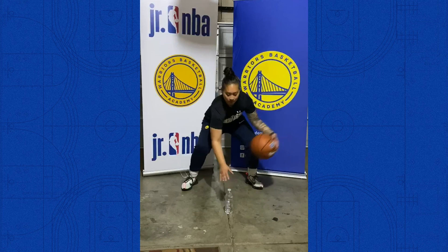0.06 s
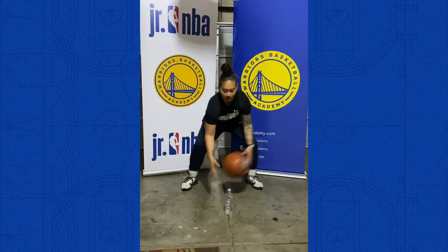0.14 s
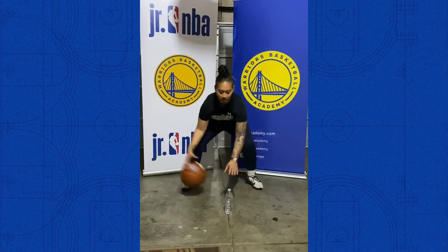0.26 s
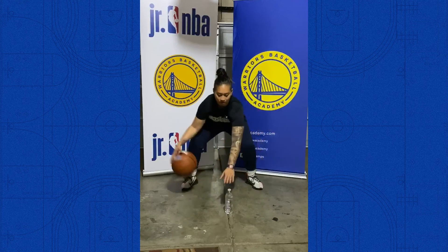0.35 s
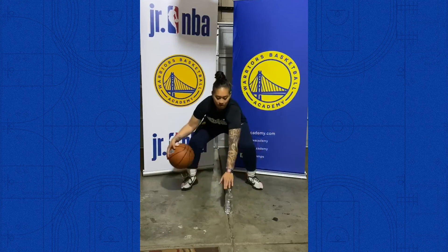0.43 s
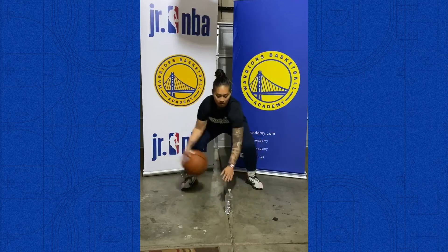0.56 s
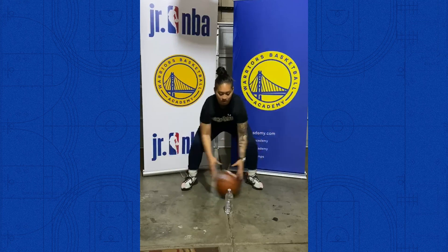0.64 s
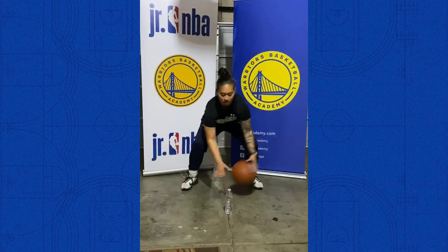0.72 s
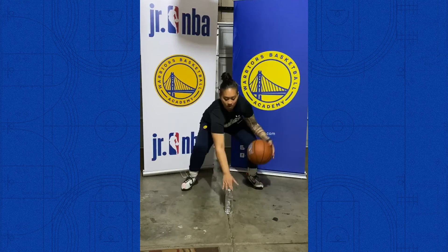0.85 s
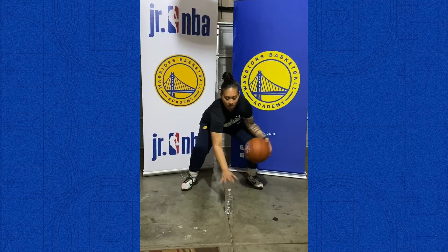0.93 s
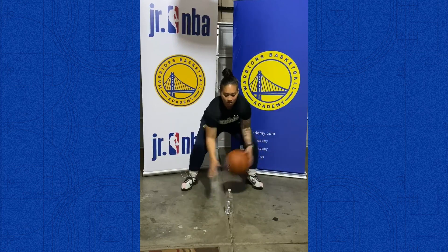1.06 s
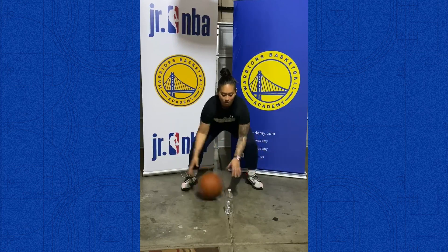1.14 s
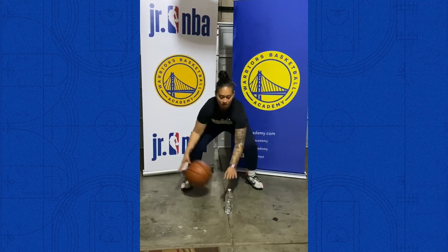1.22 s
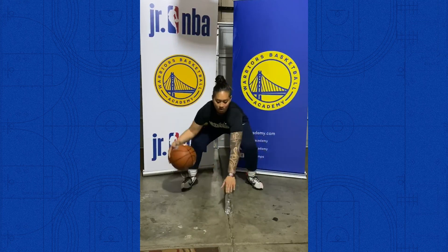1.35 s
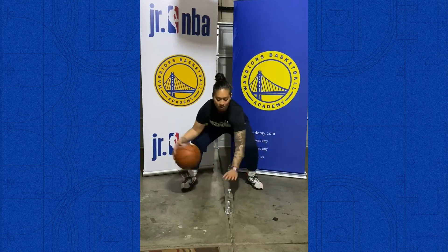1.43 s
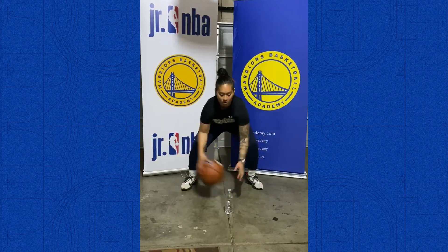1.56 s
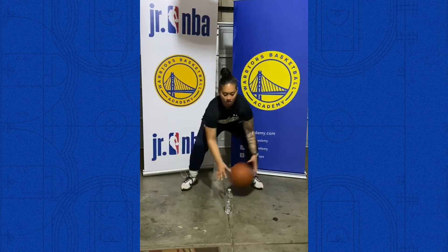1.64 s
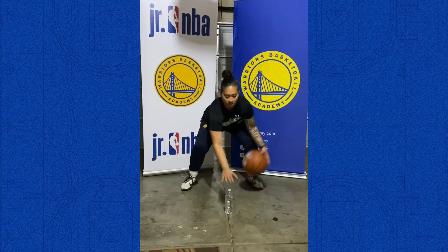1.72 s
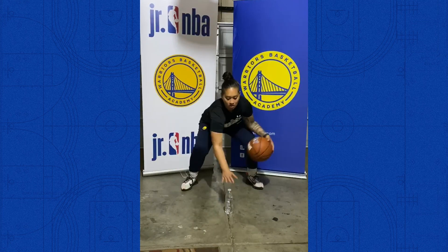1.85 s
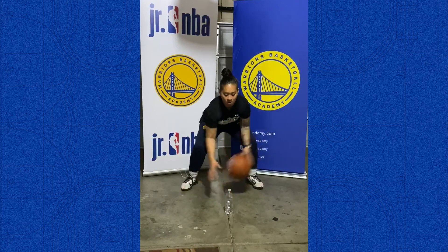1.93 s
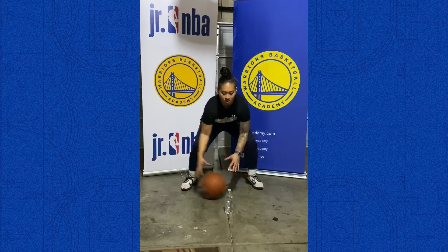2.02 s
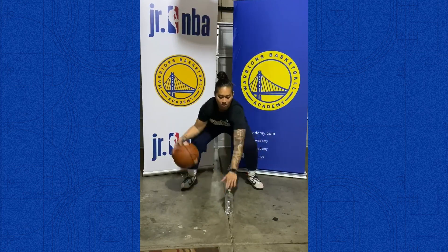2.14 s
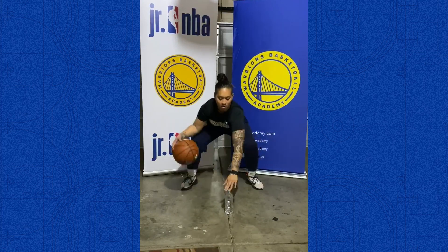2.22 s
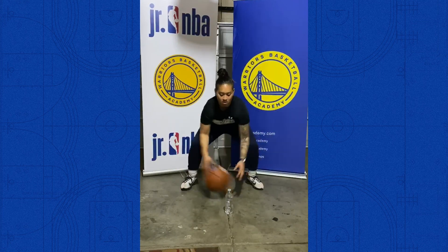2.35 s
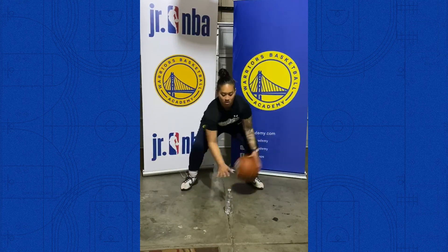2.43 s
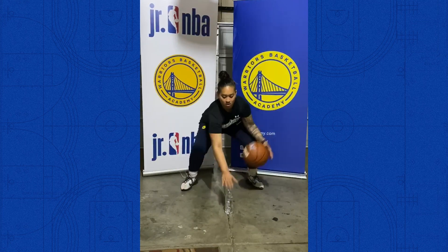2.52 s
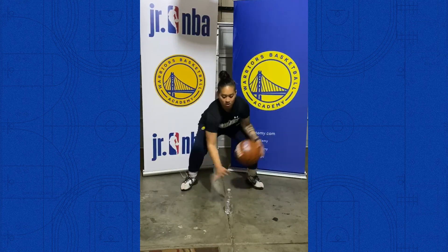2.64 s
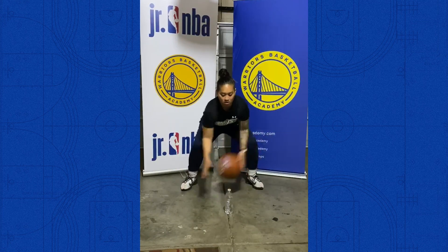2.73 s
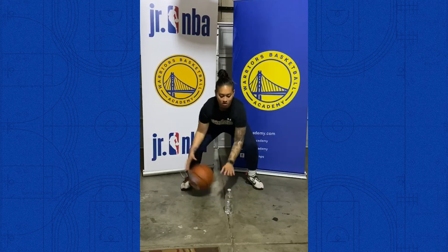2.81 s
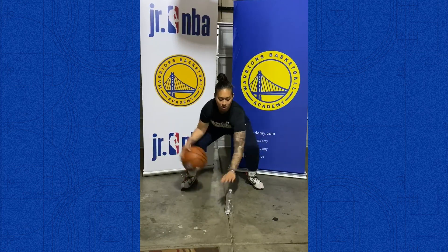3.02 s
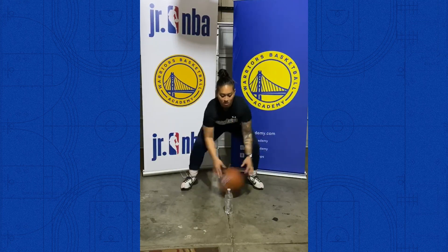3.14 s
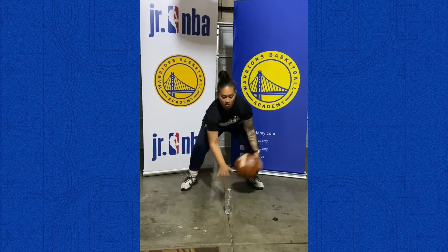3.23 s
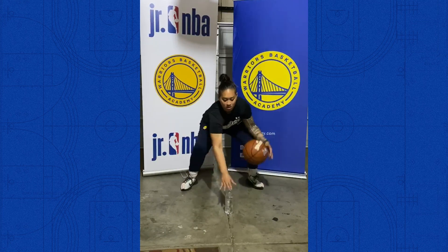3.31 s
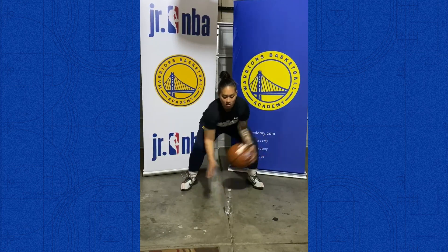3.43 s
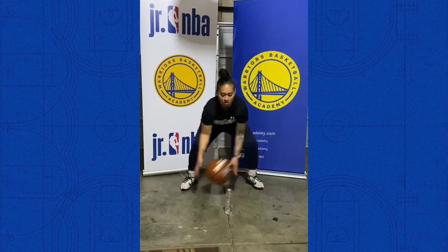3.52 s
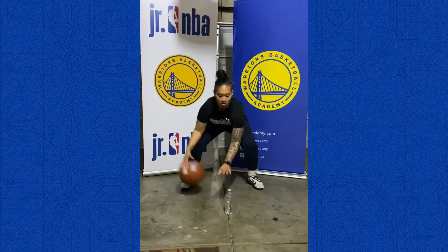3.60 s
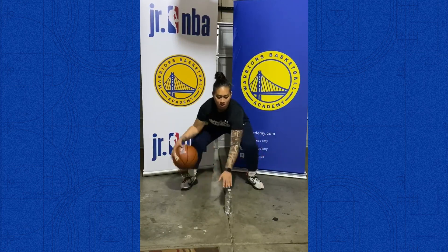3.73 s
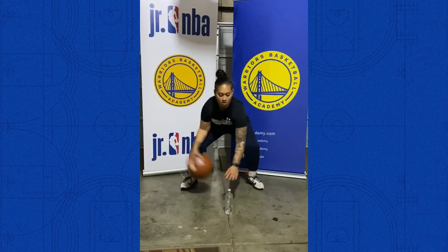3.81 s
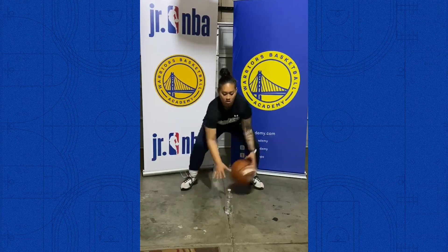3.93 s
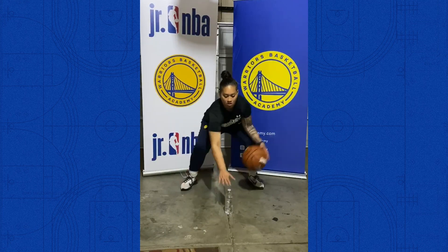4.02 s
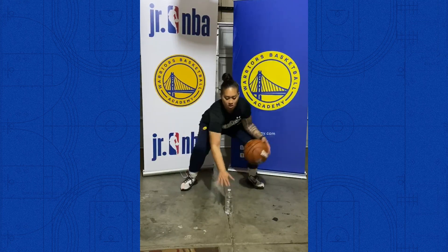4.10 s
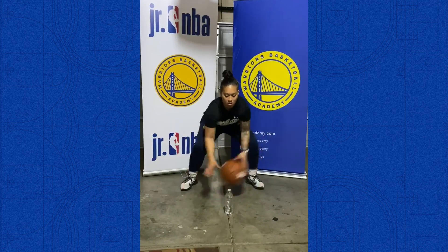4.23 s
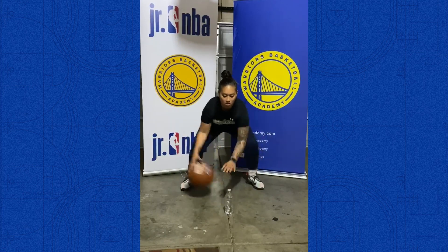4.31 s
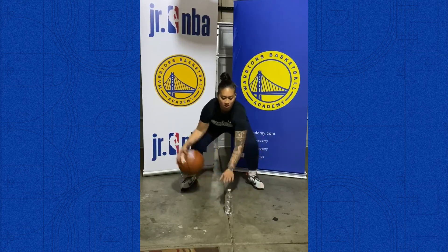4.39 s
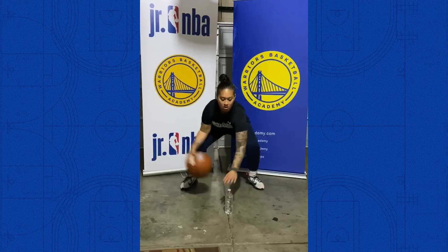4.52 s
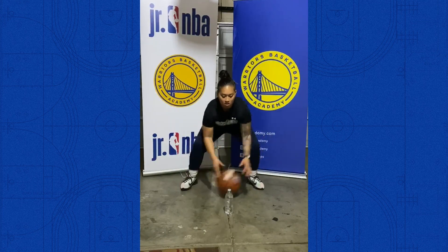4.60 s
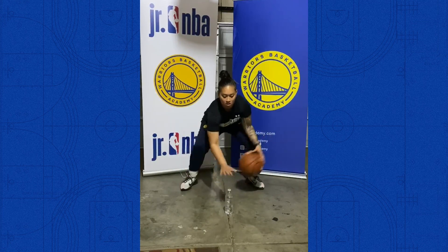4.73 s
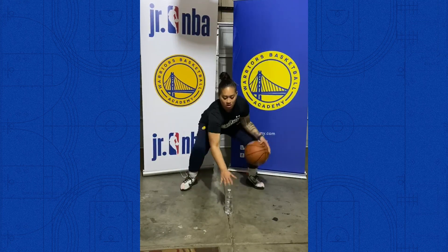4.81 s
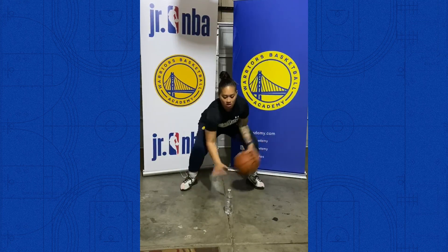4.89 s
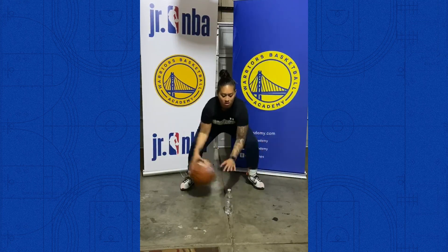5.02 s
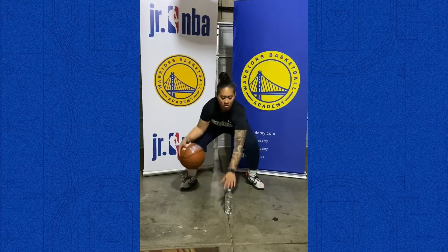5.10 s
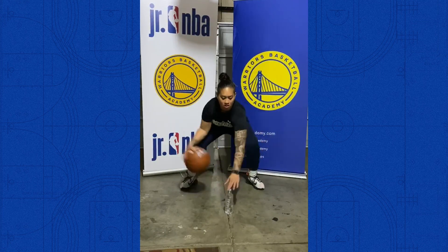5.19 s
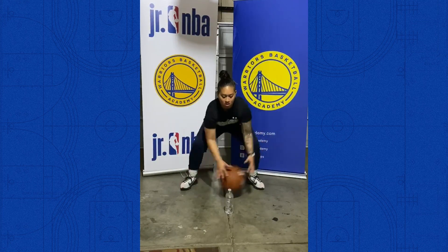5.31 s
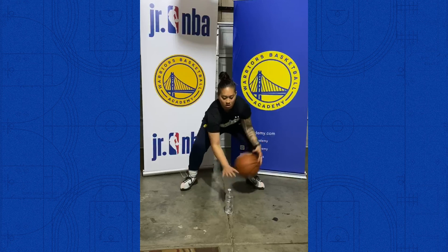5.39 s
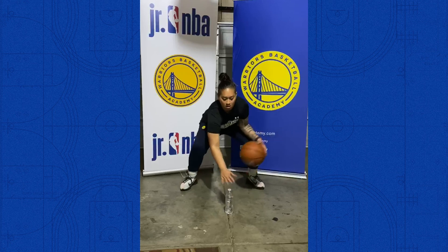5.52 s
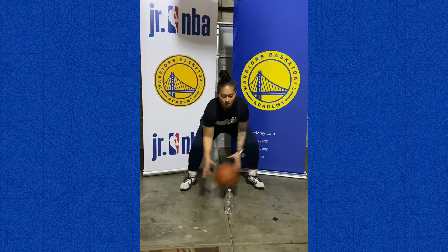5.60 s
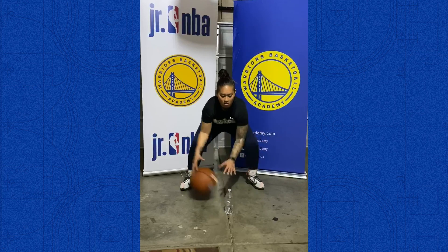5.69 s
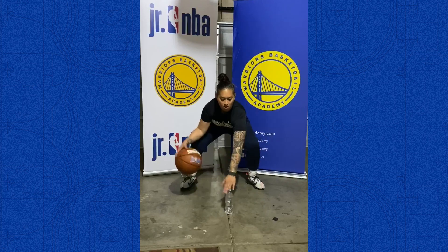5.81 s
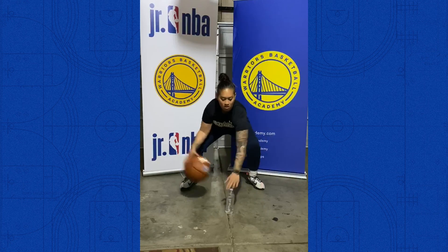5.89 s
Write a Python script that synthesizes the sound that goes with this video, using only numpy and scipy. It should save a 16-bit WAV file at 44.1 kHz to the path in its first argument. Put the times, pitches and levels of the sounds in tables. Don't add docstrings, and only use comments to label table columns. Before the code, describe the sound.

A basketball is crossed hard from hand to hand on bare concrete in a large, reverberant hall. Fifteen bounces, at first nearly half a second apart, then closer to a third, each crack with a leathery slap, a short hollow knock and a swelling low boom. Tails overlap over faint hum and ventilation. The stereo microphone is fairly close, and the loudest hits are slightly squashed.

```python
import sys
import numpy as np
from scipy import signal
from scipy.fft import rfft, irfft, next_fast_len
from scipy.io import wavfile
from scipy.ndimage import uniform_filter1d

SR = 44100
rng = np.random.default_rng(int(sys.argv[2]) if len(sys.argv) > 2 else 0)


def invert_db(x):
    u = np.asarray(x, float) / 20
    return 10 ** u


def to_wav(sig):
    pcm = np.clip(np.atleast_2d(sig), -1, 1) * 32767
    pcm = np.round(pcm).astype(np.int16)
    wavfile.write(sys.argv[1], SR, pcm.T)


N = 262395
TAIL = 32768


def rms_one(x):
    return x / np.sqrt(np.mean(x ** 2) + 1e-20)


def at_hz(points, hz):
    points = np.array(points)
    return np.interp(np.log(hz), np.log(points[:, 0]), points[:, 1])


# f/Hz, share
COHERENCE = [(60, .999), (130, 1), (250, 1), (500, 0.54), (900, 0.018), (1400, 0.4), (1900, 0.66),
             (2500, 0.39), (4700, 0.94), (5500, 0.63), (7000, 0.95), (16000, 1)]


def stereo_noise(size, spectrum):
    hz = np.maximum(np.fft.rfftfreq(size, 1 / SR), 1)
    alike = np.clip(at_hz(COHERENCE, hz), -1, 1)
    mid, side = rfft(rng.standard_normal((2, size))) * spectrum(hz)
    left_right = np.sqrt(1 + alike) * mid + np.sqrt(1 - alike) * side * [[1], [-1]]
    return rms_one(irfft(left_right, size))


def add(out, sound, s):
    i = round(s * SR)
    part = sound[:, max(-i, 0):N - i]
    start = max(i, 0)
    out[:, start:start + part.shape[1]] += part


def follows(law, knock_db, crisp_db):
    mean_db, knock_share, crisp_share = law
    mean_knock_db = -7
    return mean_db + knock_share * (knock_db - mean_knock_db) + crisp_share * crisp_db


# f/Hz, rms level/dB
HUM = [(59.2, -40), (118.4, -39), (150.7, -44)]
# f/Hz, level/dB per Hz
AIR = [(30, -25), (60, -13.5), (90, -4), (150, -11), (300, -1.5), (470, -12), (700, -19), (1500, -27),
       (3500, -32.5), (7000, -48), (12000, -46.5), (16000, -83)]


def background():
    t, size = np.arange(N) / SR, next_fast_len(N)
    air_db = -39
    out = invert_db(air_db - 5) * stereo_noise(size, lambda f: invert_db(at_hz(AIR, f)))[:, :N]
    for hz, db in HUM:
        waver = np.interp(t, np.arange(0, 6.1, .1), rng.standard_normal(61))
        tone = np.sin(2 * np.pi * (hz * t + rng.random()))
        out = out + np.sqrt(2) * invert_db(db + 1.8 * waver) * tone
    return out


def ring(hz, size, t60=0.015):
    t = np.arange(size) / SR
    rebound = 1 - np.exp(-t / 0.0016)
    phase = 2 * np.pi * hz * (0.718 * t + 0.00133 * rebound)
    return np.sin(phase) * rebound * invert_db(-60 * t / t60) * np.ones((2, 1))


def linger(hz, width_hz, t60=0.73):
    t = np.arange(TAIL) / SR
    noise = stereo_noise(TAIL, lambda f: 1 / (1 + (2 * (f - hz) / width_hz) ** 2))
    return noise * (1 - np.exp(-t / 0.0056)) * invert_db(-60 * t / t60)


# f/Hz, level/dB
CAVITY = [(1040, -7), (1295, 1.5), (1478, -4), (1830, -10), (2073, -1.5), (2254, 1.5), (3129, -4)]


def cavity(t60=0.57):
    t = np.arange(TAIL) / SR
    hz, db = np.transpose(CAVITY)[:, :, None]
    width_hz, spread_db = 120, 5.5
    gain = invert_db(db + spread_db * rng.standard_normal(hz.shape))
    noise = stereo_noise(TAIL, lambda f: np.sum(gain / (1 + (2 * (f - hz) / width_hz) ** 2), axis=0))
    return noise * (1 - np.exp(-t / 0.0013)) * invert_db(-60 * t / t60)


# f/Hz, level/dB per Hz
SLAP = [(400, -14), (1000, -17), (1500, -4), (2200, 0), (2700, -67), (3500, 4), (4300, -60), (5000, -6),
        (10000, -10.5), (14000, -9.5), (16500, -51)]


def slap(size, length_s):
    t = np.arange(size) / SR
    hz = np.maximum(np.fft.rfftfreq(size, 1 / SR), 1)
    noise = irfft(rfft(rng.standard_normal(size)) * invert_db(at_hz(SLAP, hz)), size)
    burst = noise * t * np.exp(-t / length_s)
    return burst / np.abs(burst).max() * np.ones((2, 1))


# f/Hz, level/dB per Hz
WASH = [(300, 1.5), (450, 1), (600, -6), (1000, -13.5), (1400, -16.5), (2000, -23), (2600, -22.5),
        (4000, -28), (5500, -35), (8000, -37), (12000, -36), (14000, -39), (15700, -39.5), (16300, -94)]
# f/Hz, T60/s
WASH_T60 = [(450, 0.63), (1200, 0.65), (2500, 0.67), (5000, 0.64), (10000, 0.52), (16000, 0.25)]
# f/Hz, mean level/dB, knock share, crispness share
WASH_LAW = [(597, -16, 0.47, 0.11), (1390, -12.5, 0.89, 0.23), (3200, -14.5, -0.11, 0.57),
            (10000, -12, 0.23, 0.95)]


def wash(bounces):
    size = next_fast_len(N)
    spectrum = rfft(stereo_noise(size, lambda f: invert_db(at_hz(WASH, f))))
    hz = np.fft.rfftfreq(size, 1 / SR)
    out, t = np.zeros((2, N)), np.arange(0, N + 16, 16) / SR
    for centre in 420 * 2 ** np.arange(0, 5.6, .5):
        band = np.clip(1 - 2 * np.abs(np.log2(hz / centre + 1e-9)), 0, 1)
        law = [at_hz(np.array(WASH_LAW)[:, [0, column]], centre) for column in range(1, 4)]
        t60 = at_hz(WASH_T60, centre)
        power = 0
        for s, knock_db, crisp_db in bounces:
            age = np.maximum(t - s - .0008, 0)
            reflections = 0.6 * np.exp(-age / 0.011)
            slower_tail = 0.088 * invert_db(46 * np.minimum(age, .6))
            rise = 1 - np.exp(-age / (0.003 + 1.1 / centre))
            decay = invert_db(follows(law, knock_db, crisp_db) - 60 * age / t60)
            power = power + (decay * rise * (1 + reflections + slower_tail)) ** 2
        envelope = np.interp(np.arange(N) / SR, t, np.sqrt(power))
        out += irfft(spectrum * np.sqrt(band), size)[:, :N] * envelope
    return out


# t/s, level/dB
NEAR_ECHOES = [(.002, -12.5), (.0049, -12), (.0095, -15.5), (0.017, -13), (0.031, -20.5)]


def echoed(out, direct, s):
    add(out, direct, s)
    for lag, db in NEAR_ECHOES:
        add(out, invert_db(db + rng.normal(0, 2.4, (2, 1))) * direct, s + lag)


def steady(x, span_s):
    power = uniform_filter1d(np.mean(x ** 2, axis=0), int(span_s * SR))
    return x / np.sqrt(power + 0.0091)


def swell(t, crest_s, crest_db, answer_db, tail_db, wall_s):
    first, second = t / crest_s, np.maximum(t - wall_s, 0) / crest_s
    crest = invert_db(crest_db) * (first * np.exp(1 - first)) ** 1.33
    answer = invert_db(answer_db) * (second * np.exp(1 - second)) ** 1.6
    t60 = 0.93
    tail = invert_db(tail_db - 60 * t / t60) * (1 - np.exp(-first))
    return np.sqrt(crest ** 2 + answer ** 2 + tail ** 2)


# f/Hz, width f/Hz, level/dB
BOOM = [
    [(64, 7, 7.5), (97.5, 23, -16.5), (128.6, 10.5, -6.5), (156.4, 27.4, -9), (211, 26, -5),
     (240.7, 15.4, -1.5), (276.5, 48, -5.5), (319.6, 33, -11.5), (367, 33, -19), (467.6, 44, -13.5),
     (564, 36, -23)],
    [(60.5, 8.2, -3.5), (104.2, 11.5, -1), (129.6, 11, 1), (155.2, 38, -3), (213.5, 48, -3.5),
     (251.4, 85, -8), (297, 55, -3.5), (351.6, 25, -6), (385, 69, -26), (474, 48, -13), (543, 28, -26)],
]
# crest t/s, crest level/dB, far-wall level/dB, diffuse tail level/dB
SWELL = [
    [(.02, -8.5, -31, -21.5), (0.015, -1, -6.5, -10), (.024, 3.6, -6.5, -9.5)],
    [(0.02, -4, -17.5, -10.5), (0.014, -1.8, -10.5, -12), (0.028, -2, -12, -9)],
]
FAR_WALL_S = [.085, 0.083]
SPLITS_HZ = [82.3, 184]


def boom(spot, scatter_db=-5, blur_s=0.062):
    t = np.arange(TAIL) / SR
    hz, width, db = np.transpose(BOOM[spot])[:, :, None]
    apart = np.arccos(np.clip(at_hz(COHERENCE, hz), -1, 1)) / 2
    start = 2 * np.pi * (hz * t + rng.random(hz.shape))
    strength = invert_db(db) * np.sqrt(width)
    modes = [np.sum(strength * np.sin(start + side * apart), axis=0) for side in (1, -1)]

    def resonances(f):
        return np.sqrt(np.sum(invert_db(2 * db) / (1 + (2 * (f - hz) / width) ** 2) ** 2, axis=0))

    scatter = stereo_noise(TAIL, resonances)
    field = rms_one(np.array(modes)) * np.exp(-t / blur_s) + invert_db(scatter_db) * scatter
    filters = [signal.butter(4, edge, fs=SR, output="sos") for edge in SPLITS_HZ]
    deep, low = [signal.sosfiltfilt(sos, field) for sos in filters]
    bands = [deep, low - deep, field - low]
    parts = []
    for part, shape, span_s in zip(bands, SWELL[spot], [.05, .03, .018]):
        parts.append(steady(rms_one(part), span_s) * swell(t, *shape, FAR_WALL_S[spot]))
    return np.array(parts)


PUSH_SHARES = [0.23, 0.69, 0.81]


def pushed(parts, push_db, s):
    mean_push_db = -7.5
    settling_db = 0.8 * (s - N / SR / 2)
    level_db = mean_push_db + np.multiply(PUSH_SHARES, push_db - mean_push_db) + [settling_db, 0, 0]
    return np.sum(invert_db(level_db)[:, None, None] * parts, axis=0)


# t/s, push level/dB, air knock level/dB, knock f/Hz, slap crispness level/dB
BOUNCES = [(0.2432, -8.5, -6, 1420, 1.5), (0.6651, -13.5, -15, 1480, -3), (1.1639, -8, -10, 1330, 3.5),
           (1.615, -8.5, -7, 1316, -0.5), (2.025, -6.5, -7.5, 1320, 7.5), (2.3872, -9, -3, 1220, -6),
           (2.795, -5.5, -8, 1640, 8.5), (3.139, -8, -4.5, 1200, -2.5), (3.5756, -4.5, -6, 1570, 2.5),
           (3.9031, -8.5, -7.5, 1970, -4), (4.277, -8, -3.5, 1530, -1), (4.616, -10.5, -5, 1440, -2.5),
           (4.9724, -6, -4.5, 1490, 7.5), (5.3, -10, -4.5, 1433, -3), (5.6671, -7, -4.5, 1650, -1)]
# t/s with its sign reversed, push, knock and crispness
# level/dB
FAINT = (-0.7, -14.5, -28, -11.5)
# t/s, peak level/dB
TOUCHES = [
    (0.5894, -48),
    (1.0494, -49),
    (3.369, -44),
    (3.4146, -38),
    (3.4234, -45),
]
# mean level/dB, knock share, crispness share
SLAP_LAW, LINGER_LAW = (-9.5, -.15, 1), (-30, 1, 0.13)
COVER_LAW, CAVITY_LAW = (-39.5, 0.78, 0.59), (-31, .6, 0.34)


def scene():
    minus_s, push_db, *rest = FAINT
    landings = [(-minus_s, *rest)] + [(s, knock_db, crisp_db) for s, _, knock_db, _, crisp_db in BOUNCES]
    out = background() + wash(landings)
    halls = [boom(spot=0), boom(spot=1)]
    fresh = [boom(k % 2) for k in range(4)]
    add(out, invert_db(push_db) * halls[1].sum(axis=0), -minus_s)
    for k, (s, push_db, knock_db, hz, crisp_db) in enumerate(BOUNCES):
        slap_db, linger_db, cover_db, cavity_db = [
            follows(law, knock_db, crisp_db) for law in (SLAP_LAW, LINGER_LAW, COVER_LAW, CAVITY_LAW)]
        echoed(out, invert_db(knock_db + 4.5) * ring(hz, size=1024), s)
        add(out, invert_db(linger_db) * linger(hz, width_hz=300), s)
        add(out, invert_db(cover_db) * linger(5400, width_hz=1500, t60=0.62), s)
        add(out, invert_db(cavity_db) * cavity(), s)
        echoed(out, invert_db(slap_db + 2.5) * slap(size=512, length_s=0.00027), s + 0.00073)
        answer = 0.88 * halls[k % 2] + 0.37 * fresh[k % len(fresh)]
        add(out, invert_db(-2.0) * pushed(answer, push_db, s), s + 0.00405)
    for s, db in TOUCHES:
        add(out, invert_db(db + 1.5) * slap(size=512, length_s=0.00079), s)
    return out


def low_pass(x):
    return signal.sosfilt(signal.butter(12, 16740, fs=SR, output="sos"), x)


# f/Hz, phase by which left leads/rad
PORTS = [(0, 0), (1700, 0), (2800, 1.1), (4200, 1.2), (5000, .35), (6500, 2.55), (7900, 3.7), (10300, 6.28),
         (12700, 8.7), (14500, 10.1), (15700, 11.9), (22050, 19)]


def record(dry):
    size = next_fast_len(N + 512)
    lead = np.interp(np.fft.rfftfreq(size, 1 / SR), *np.transpose(PORTS))
    turn = np.exp(.5j * lead * np.array([[1], [-1]]))
    x = irfft(rfft(dry, size) * turn, size)[:, :N]
    x = signal.sosfilt(signal.butter(4, 52, "high", fs=SR, output="sos"), x)
    x = x / (1 + np.abs(x) ** 12) ** (1 / 12)
    return low_pass(x)


dry = scene()
out = record(dry)
to_wav(out)
```